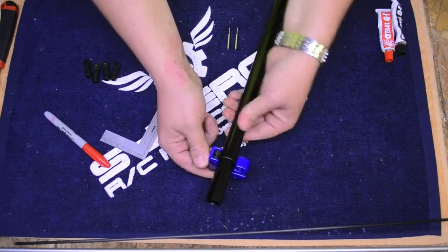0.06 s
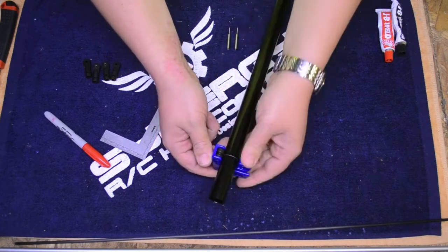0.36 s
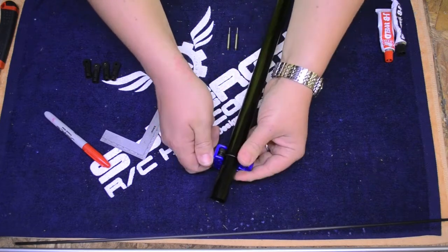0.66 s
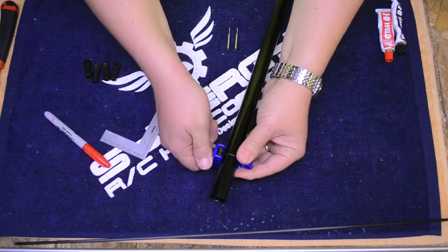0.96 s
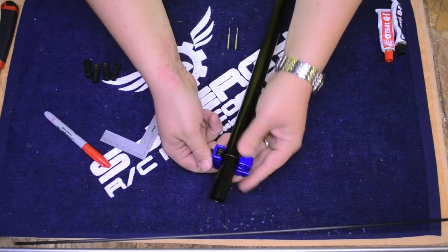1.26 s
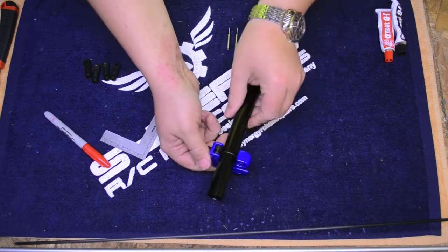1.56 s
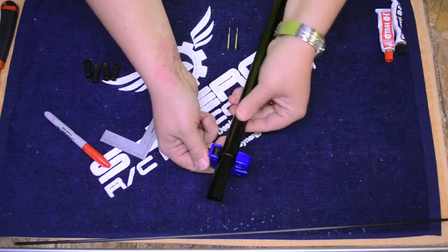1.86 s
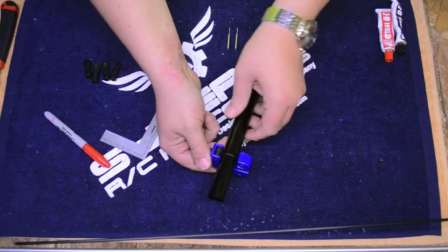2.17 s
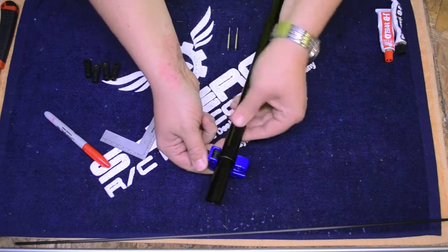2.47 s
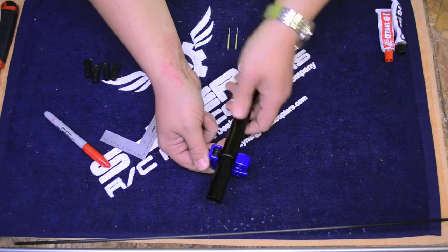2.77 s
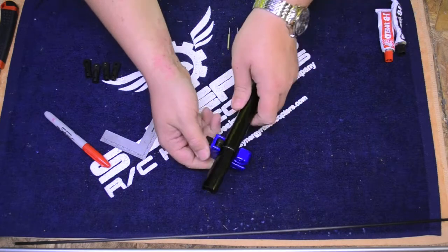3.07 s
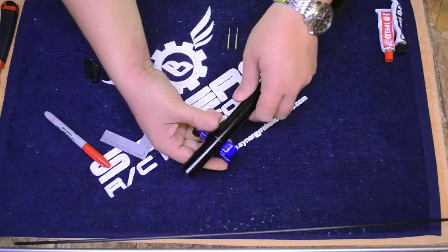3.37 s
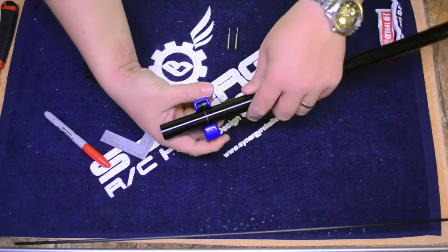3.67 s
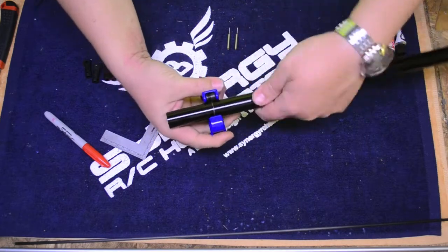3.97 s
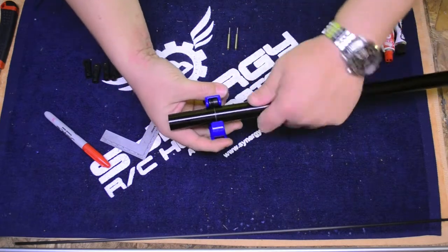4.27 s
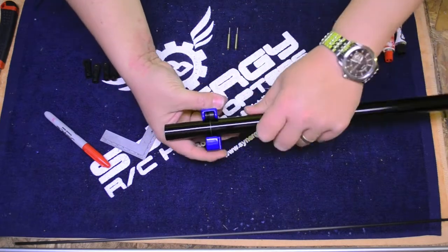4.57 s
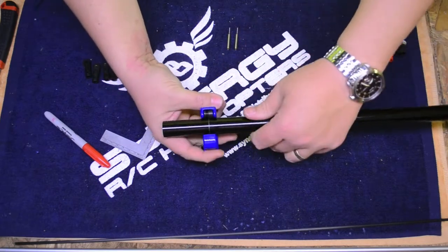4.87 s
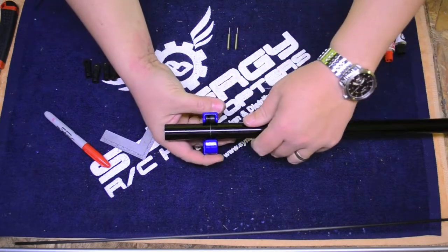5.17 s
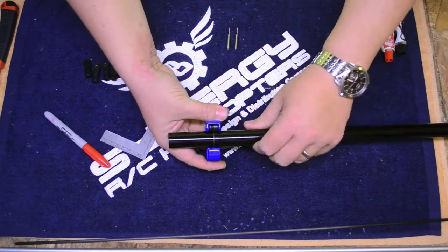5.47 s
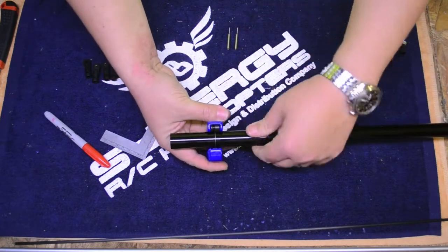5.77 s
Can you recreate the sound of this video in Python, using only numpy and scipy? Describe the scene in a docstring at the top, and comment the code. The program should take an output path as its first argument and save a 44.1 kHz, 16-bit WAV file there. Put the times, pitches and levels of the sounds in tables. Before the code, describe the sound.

Hands turn a small pipe cutter around a thin tube, making faint finger rubs, light knocks and little metallic clinks and ticks. About halfway, a hand bumps the cloth-covered bench with a soft thud. Near the end the tube cracks with one loud, sharp snap, then several smaller ones with a brief ring and slight scraping. A fan hums faintly throughout the small room, and everything sounds close.

```python
"""At a cloth-covered bench, in a small room with a humming fan, hands work a pipe cutter round a thin tube.
Fingers rub the tube by stick-slip friction and knock it at each tug. Light impacts make metal clink and
the cutter tick, and a hand bumps the bench, exciting its low modes. Near the end a fingertip squeaks,
the scored wall fractures in a few sharp snaps that set the tube ringing, and the cut edges scrape."""
import sys
import numpy as np
from scipy import signal
from scipy.fft import rfft, irfft, next_fast_len
from scipy.io import wavfile
from scipy.ndimage import uniform_filter1d

SR = 44100
rng = np.random.default_rng(int(sys.argv[2]) if len(sys.argv) > 2 else 0)


def digitize_waveform(pressure):
    """Quantize a signal to 16-bit integers and store it at the path in sys.argv[1].

    Rows of a 2-D input are taken as channels; values are limited to [-1, 1].
    """
    field = np.atleast_2d(pressure).T
    bounded = np.clip(field, -1, 1)
    quanta = np.round(bounded * 32767).astype(np.int16)
    wavfile.write(sys.argv[1], SR, quanta)


N = 265041
BAND_LIMIT_HZ = 10800

# Levels in the tables are relative; a tilt is a spectral slope in dB per octave.
# The fan's fainter tones. Each row: frequency in Hz, bandwidth in Hz, level in dB.
FAN_TONES = [(410, 10, -76), (549, 46, -72), (814, 7.2, -86), (1179, 10, -74), (1947, 14, -75),
             (2286, 29, -76), (2793, 26, -76.5), (2858, 47, -75.5)]
# Hands slide on tube and cutter. Each row: start in seconds, length in seconds, level in dB, swell in dB.
HAND_SLIDES = [(0, 0.1, -67, 0.5), (.165, 0.052, -64, -0.5), (.305, .2, -68, -11), (1.33, 0.12, -73.5, 0),
               (1.74, .06, -64.5, -5), (1.85, .11, -65.5, -9), (2.04, 0.03, -71, 1),
               (2.46, .14, -75.5, 11.5), (3.57, .11, -76, 3), (3.815, 0.086, -61.5, -9.5),
               (4.02, .06, -72.5, 0), (4.27, 0.087, -71.5, 6), (4.46, 0.17, -73.5, 1.5),
               (4.75, 0.11, -65, -10.5), (4.905, 0.18, -56.5, 6), (5.483, 0.026, -56, -1)]
# Fingers tug the tube. Each row: catch and release times in seconds, levels of catch, drag and release
# in dB, tilt of the release, grip resonance in Hz.
TUGS = [(0.026, 0.058, -40.5, -48, -46, 2, 945), (0.074, 0.1035, -45, -54, -37.5, 3.5, 806),
        (1.729, 1.745, -44, -56, -27.5, 3, 785), (1.839, 1.894, -45.5, -59, -50, -4, 786),
        (2.463, 2.557, -42, -54, -34.5, 0, 772), (2.577, 2.596, -41.5, -49.5, -28, 3, 760),
        (3.829, 3.911, -42, -59, -43.5, -0.5, 1070), (4.283, 4.353, -48, -51.5, -39.5, -1.5, 1100),
        (4.727, 4.7462, -42, -57, -32, 4.5, 1000), (4.784, 4.816, -47, -54.5, -48, 0, 900)]
# Metal touches the tube. Each row: start in seconds, level in dB, tilt, ping in Hz, ping level in dB.
CLINKS = [(.17, -46.5, -2.5, 1700, 2), (.2215, -41, .5, 4940, -4.5), (.474, -48.5, -3, 3980, 0),
          (1.264, -48.5, -2.5, 4000, -13), (1.291, -34, -2.5, 1432, -2), (1.512, -46, -2.5, 4640, -13),
          (2.114, -47.5, 3, 1985, 3), (2.128, -44, -4.5, 4660, -19), (2.148, -48.5, 0, 4550, 1),
          (3.656, -55.5, 2, 4560, 9), (4.054, -49.5, 2, 3950, -4), (4.075, -55.5, 4, 3940, -5)]
# The cutter ticks and scuffs. Each row: start in seconds, level in dB, tilt, T60 in seconds.
TICKS = [(.735, -60, 2, .04), (.817, -59, 0, 0.056), (1.1362, -39, 5, 0.031), (2.77, -48.5, -1, 0.15),
         (3.334, -51.5, -2.5, 0.034), (4.219, -54.5, -0.5, .06), (4.275, -49, -3.5, 0.062),
         (4.463, -47.5, -4, .04), (5.438, -42.5, 0, 0.026), (5.492, -41.5, 2.5, 0.059),
         (5.885, -50, -0.5, 0.13), (5.977, -53, -1, 0.066)]
# A hand bumps the bench. Each row: start in seconds, level in dB, tilt, frame level in dB.
BUMPS = [(2.7205, -27.5, 0.5, -11.5), (2.7325, -38.5, 3, -13), (5.397, -32.5, 5.5, -32),
         (5.411, -46, 5, -42), (5.428, -42.5, 0.5, -26), (5.445, -45, 3, -36), (5.478, -41.5, 3.5, -29)]
# The wall cracks. Each row: start in seconds, level in dB, tilt, splintering in dB, edge ring in dB.
SNAPS = [(5.1208, -8, 1.5, -1.5, -12.5), (5.267, -17.5, 0, 8, -34), (5.2975, -20.5, 0.5, 5.5, -30),
         (5.382, -32.5, 2, -3, -26), (5.593, -24.5, 1, 2, 0), (5.622, -35.5, -0.5, 11, -13),
         (5.6665, -33.5, 0.5, 1, 11), (5.746, -41.5, 3.5, 6, 8)]
# The cut edges grind. Each row: start in seconds, length in seconds, level in dB.
SCRAPES = [(5.615, 0.043, -45), (5.68, .028, -46.5), (5.732, 0.023, -47.5)]

# Normal modes. Each row: frequency in Hz, level in dB, T60 (time to fall 60 dB) in seconds.
HELD_TUBE_MODES = [(731, -2, 0.077), (908, 1, 0.014), (1082, -1.5, 0.048), (1530, -10, 0.045),
                   (1870, -10, 0.072), (2460, -17, 0.016), (2740, -21, 0.047), (4920, -31, 0.018)]
METAL_MODES = [(1186, 1, 0.079), (1960, 0.5, 0.039), (2310, -9, .08), (2810, -4, 0.073), (3900, -17, 0.052),
               (4390, -10, 0.12), (4650, -13, 0.069), (5370, -17, 0.065), (6290, -23, 0.14),
               (8700, -17, 0.078)]
BENCH_MODES = [(139, -38, 0.051), (255, 0.5, 0.065), (304, 0, 0.061), (371, 1.5, 0.049), (477, -5, 0.036),
               (639, -8, 0.046), (995, -41, 0.015), (1480, -8, 0.033)]
FRAME_MODES = [(55, -9.5, .4), (124, -8, .2), (98, -1, .3)]
WALL_MODES = [(376, -21.5, 0.065), (495, -13, 0.08), (830, -3, 0.024), (1098, -5, 0.046),
              (1220, -6.5, 0.031), (1325, -6, 0.019), (1620, -7, 0.019), (2027, 5, 0.032),
              (2230, -5, 0.021), (2830, -4, 0.061), (3890, -16, 0.023), (5040, -3, .035),
              (5340, -3.5, 0.027), (5700, -6.5, 0.033), (6070, -8, 0.026), (7600, -24, .03),
              (8940, -14, .025)]
WHOLE_TUBE_MODES = [(4392, 0, .26), (4420, -3, .24), (4465, -2, .2), (4540, 0, .16)]  # sing on faintly after a crack
RECOIL_MODES = [(1750, 0, .005)]  # the wall springs back
CUT_EDGE_MODES = [(4710, 2, 0.071), (5140, -5, 0.043), (5020, 5.5, 0.057), (5770, 4.5, 0.026),
                  (6100, -3, 0.024), (7120, -4.5, 0.046), (8860, -14, .04)]

# Noise spectra. Each row: frequency in Hz, spectral density in dB.
AIR_SPECTRUM = [(18, -52), (30, -18.5), (346, -11), (401, -7.5), (466, -8), (554, -5), (1030, -11),
                (1190, -9.5), (1600, -9), (2210, -15.5), (2560, -18), (2830, -14.5), (4630, -23.5),
                (9250, -36), (11000, -43.5), (14300, -85), (22000, -120)]
SLIDE_SPECTRUM = [(400, -7.5), (1500, 1), (2800, 1), (3700, -3), (5000, -2.5), (7500, -10), (9200, -5),
                  (11000, -20.5)]
DRAG_SPECTRUM = [(250, -27), (600, -4.5), (800, 0), (1080, -1.5), (1350, -14), (1900, -10), (3500, -19),
                 (5000, -24), (7500, -28.5), (9200, -35), (11000, -84)]
TICK_SPECTRUM = [(300, -15), (1200, -5), (2100, 9.5), (3200, 6), (5000, 6), (7000, -0.5), (9500, 2.5),
                 (11000, -28)]
CLOTH_SPECTRUM = [(300, -3), (700, -9), (1100, 4), (1500, -2), (2100, -4.5), (3000, -15), (5000, -25),
                  (10000, -35)]
SPLINTER_SPECTRUM = [(100, -12), (330, -16), (520, -1), (700, 9), (900, 8.5), (1500, 7), (2100, 2),
                     (3000, -4), (3900, -11.5), (4900, -5), (6300, -6), (8000, -10), (10500, -18)]
SCRAPE_SPECTRUM = [(300, -5.5), (900, 0), (1450, 3.5), (2300, -6.5), (4100, -16), (4750, 3.5), (5400, -8),
                   (6200, -0.5), (7800, -23), (8900, -7), (11000, -34)]

# Reflections from near surfaces. Each row: delay in seconds, amplitude ratio.
ECHOES = [(.0023, 0.58), (.0047, 0.14), (0.013, 0.16), (.0158, 0.055), (0.02, 0.083)]
# The room's reverberation time. Each row: frequency in Hz, T60 in seconds.
ROOM_T60 = [(100, 0.13), (400, 0.27), (1500, 0.28), (5000, 0.33), (10000, 0.3)]
# The colour of the reverberation. Each row: frequency in Hz, gain in dB.
ROOM_SPECTRUM = [(60, 16.5), (150, -8), (280, 6.5), (1500, 2.5), (3000, 2.5), (6000, 1), (10000, 1.5)]


def amp(db):
    """Amplitude grows tenfold for every 20 dB."""
    return 10 ** (np.asarray(db) / 20)


def unit(x):
    """Normalisation to an rms of 1."""
    return x / np.sqrt(np.mean(x ** 2) + 1e-20)


def attack_unit(x):
    """Normalisation of a transient to an rms of 1 over its first 5 ms."""
    return x / np.sqrt(np.mean(x[:SR // 200] ** 2) + 1e-20)


def curve_at(points, hz):
    """Interpolation along a logarithmic frequency axis."""
    f, value = np.transpose(points)
    return np.interp(np.log(hz + 1), np.log(f + 1), value)


def add(mix, start_s, sound):
    """Superposition: a sound adds linearly to the mix from its start time."""
    part = mix[max(round(start_s * SR), 0):][:len(sound)]
    part += sound[:len(part)]


def colour(x, spectrum):
    """Filtering multiplies the spectrum of x by a gain curve; the result has an rms of 1."""
    size = next_fast_len(len(x))
    gain = amp(curve_at(spectrum, np.fft.rfftfreq(size, 1 / SR)))
    return unit(irfft(rfft(x, size) * gain, size)[:len(x)])


def low_cut(x, hz, order):
    """A high-pass filter attenuates the bass by 6 dB per octave for each order."""
    return signal.sosfilt(signal.butter(order, hz, "high", fs=SR, output="sos"), x)


def brighten(x, tilt):
    """A minimum-phase filter tilts the spectrum causally, so nothing precedes the onset."""
    size = 2 * len(x)
    hz = np.clip(abs(np.fft.fftfreq(size, 1 / SR)), 100, BAND_LIMIT_HZ)
    log_gain = np.log(amp(tilt * np.log2(hz / hz.mean())))
    response = np.exp(np.conj(signal.hilbert(log_gain)))
    return np.fft.ifft(np.fft.fft(x, size) * response).real[:len(x)]


def ring(modes):
    """Free vibration is a sum of damped modes, here with neighbours in opposite phase."""
    t = np.arange(SR // 2) / SR
    partials = ((-1) ** k * amp(db - 60 * t / t60) * np.sin(2 * np.pi * hz * t)
                for k, (hz, db, t60) in enumerate(modes))
    return attack_unit(sum(partials))


def burst(spectrum, t60):
    """A brief contact radiates broadband noise that decays exponentially."""
    t = np.arange(SR // 2) / SR
    noise = colour(rng.standard_normal(len(t)), spectrum)
    return attack_unit(noise * amp(-60 * t / t60))


def impacts(rows, sound, gain_db):
    """Transients superpose, each with its own level and tilt; further columns are passed to sound."""
    out = np.zeros(N)
    for start, db, tilt, *settings in rows:
        transient = attack_unit(brighten(sound(*settings), tilt))
        add(out, start, amp(db + gain_db) * transient)
    return out


def strokes(rows, rise_share, release_s):
    """The amplitude envelope of each stroke rises, holds or changes steadily, then decays."""
    out = np.zeros(N)
    for start, length, db, *swell in rows:
        t = np.arange(0, length + 10 * release_s, 1 / SR)
        rise = np.minimum(t / (rise_share * length), 1)
        held = amp(db + sum(swell) * np.minimum(t / length, 1))
        release = np.exp(-np.maximum(t - length, 0) / release_s)
        add(out, start, held * rise * release)
    return out


def friction(envelope, spectrum, slips_per_s, hiss):
    """Sliding friction is a random train of tiny, uneven slips over a smooth hiss."""
    sizes = rng.uniform(-1.14, 1, N)
    slips = unit(sizes * (rng.random(N) < slips_per_s / SR))
    return envelope * colour(slips + hiss * rng.standard_normal(N), spectrum)


def fan_noise():
    """Moving air gives broadband noise; narrow bands of noise are heard as wavering tones."""
    hz = np.fft.rfftfreq(N, 1 / SR)
    power = sum((amp(db) * unit(1 / (1 + (2 * (hz - centre) / width) ** 2))) ** 2
                for centre, width, db in FAN_TONES)
    tones = irfft(rfft(rng.standard_normal(N)) * np.sqrt(power), N)
    air = amp(-61.04) * colour(rng.standard_normal(N), AIR_SPECTRUM)
    return tones + air


def fan_hum(hz, drift_hz, db):
    """The fan's main tone is a sinusoid under slight, slow frequency modulation."""
    pitch = hz + drift_hz * unit(uniform_filter1d(rng.standard_normal(N), size=6000))
    return amp(db) * unit(np.sin(2 * np.pi * np.cumsum(pitch) / SR))


def rubbing():
    """Friction of skin on metal: hands slide lightly, and fingers drag more coarsely during each tug."""
    sliding = strokes(HAND_SLIDES, rise_share=0.14, release_s=0.024)
    pulls = [(catch, release - catch, drag_db) for catch, release, _, drag_db, *_ in TUGS]
    dragging = strokes(pulls, rise_share=0.1, release_s=0.006)
    slide = amp(0.5) * friction(sliding, SLIDE_SPECTRUM, slips_per_s=700, hiss=0.77)
    drag = amp(-5) * friction(dragging, DRAG_SPECTRUM, slips_per_s=350, hiss=0.22)
    return slide + drag


def knocks(catch_tilt):
    """Each end of a tug excites the tube's hand-damped modes and a resonance set by the grip."""
    tube = ring(HELD_TUBE_MODES)

    def knock(grip_hz):
        return tube + amp(-3) * ring([(grip_hz, 0, 0.03)]) + amp(-25) * burst(TICK_SPECTRUM, t60=0.03)
    rows = []
    for catch, release, catch_db, _, release_db, release_tilt, grip_hz in TUGS:
        rows.append((catch, catch_db, catch_tilt, grip_hz))
        rows.append((release, release_db, release_tilt, grip_hz))
    return impacts(rows, knock, gain_db=-8.5)


def clinks(ping_t60):
    """Light impacts excite the metal's modes, each contact with a high ping of its own."""
    metal = ring(METAL_MODES)

    def clink(ping_hz, ping_db):
        ping = amp(ping_db) * ring([(ping_hz, 0, ping_t60)])
        return metal + ping + amp(-3.5) * burst(TICK_SPECTRUM, t60=0.014)
    return impacts(CLINKS, clink, gain_db=-9.5)


def ticks():
    """Contact noise without resonance gives the cutter's dry clicks."""
    return impacts(TICKS, lambda t60: burst(TICK_SPECTRUM, t60), gain_db=-10)


def bench_bumps():
    """Soft impacts excite the bench top, with a puff from the cloth; heavy ones couple to the frame."""
    top, frame = ring(BENCH_MODES), ring(FRAME_MODES)

    def bump(frame_db):
        return top + amp(frame_db) * frame + amp(-10.5) * burst(CLOTH_SPECTRUM, t60=0.071)
    return impacts(BUMPS, bump, gain_db=-10.5)


def squeak(start_s, length_s, hz, waver, db):
    """Stick-slip oscillation of a fingertip gives an unsteady tone that swells and fades."""
    t = np.arange(0, length_s, 1 / SR)
    pitch = hz * (1 + waver * unit(uniform_filter1d(rng.standard_normal(len(t)), size=100)))
    envelope = amp(db) * np.sin(np.pi * t / length_s) ** 2
    out = np.zeros(N)
    add(out, start_s, envelope * np.sin(2 * np.pi * np.cumsum(pitch) / SR))
    return out


def snaps():
    """Fracture jolts the wall, splinters briefly and leaves the tube and its fresh edge ringing."""
    recoil = low_cut(ring(RECOIL_MODES), hz=557, order=2)
    wall = ring(WALL_MODES) + amp(-24) * ring(WHOLE_TUBE_MODES) - amp(0.5) * recoil
    edge = ring(CUT_EDGE_MODES)

    def crack(splinter_db, edge_db):
        return wall + amp(splinter_db) * burst(SPLINTER_SPECTRUM, t60=0.03) + amp(edge_db) * edge
    return impacts(SNAPS, crack, gain_db=-8)


def scrapes():
    """Friction between the cut edges gives a dense train of slips."""
    envelope = strokes(SCRAPES, rise_share=0.25, release_s=0.012)
    return amp(-5.5) * friction(envelope, SCRAPE_SPECTRUM, slips_per_s=1300, hiss=0.89)


def room(x, wet_db, build_s=0.0085, early_boost=1.75, early_s=0.0079):
    """Reverberation by convolution: near echoes, a dense early cluster and a tail decaying band by band."""
    t = np.arange(SR // 2) / SR
    hz, frame_s, bands = signal.stft(rng.standard_normal(len(t)), SR, nperseg=256)
    decay = amp(-60 * frame_s / curve_at(ROOM_T60, hz)[:, None])
    diffuse = signal.istft(bands * decay, SR)[1][:len(t)]
    onset = np.minimum(t / build_s, 1) ** 3 * (1 + early_boost * np.exp(-t / early_s))
    spectrum = rfft(diffuse * onset)
    # many paths add up to an even power in each narrow band
    spectrum /= np.sqrt(uniform_filter1d(abs(spectrum) ** 2, size=50))
    spectrum *= amp(curve_at(ROOM_SPECTRUM, np.fft.rfftfreq(len(t), 1 / SR)))
    fade = np.cos(np.pi / 2 * t / t[-1])
    response = amp(wet_db) * irfft(spectrum, len(t)) * fade
    response[0] += 1  # direct sound
    for delay, gain in ECHOES:
        add(response, delay, np.array([gain]))
    return signal.fftconvolve(x, response)[:N]


def scene():
    """The contact sounds reverberate in one room and superpose on the steady fan."""
    fan = fan_noise() + fan_hum(hz=405.5, drift_hz=0.82, db=-67)
    fingertip = squeak(start_s=5.048, length_s=0.053, hz=1240, waver=0.0069, db=-52)
    tube = room(rubbing() + fingertip + scrapes(), wet_db=-3.5)
    tube += room(knocks(catch_tilt=1.7), wet_db=-10)
    tube += room(snaps(), wet_db=-5)
    cutter = room(clinks(ping_t60=0.058), wet_db=-3) + room(ticks(), wet_db=-12)
    held = low_cut(tube + cutter, hz=200, order=2)  # small bodies radiate little bass
    bench = room(bench_bumps(), wet_db=-4)
    return (fan + held + bench)[None]


def record(dry):
    """Band limiting: the microphone rolls off the bass and the recorder cuts the highest treble."""
    heard = low_cut(dry, hz=39.5, order=4)
    low_pass = signal.firwin(121, BAND_LIMIT_HZ, window=("kaiser", 7), fs=SR)
    return signal.oaconvolve(heard, low_pass[None], "same")


dry = scene()
out = record(dry)
digitize_waveform(out)
```